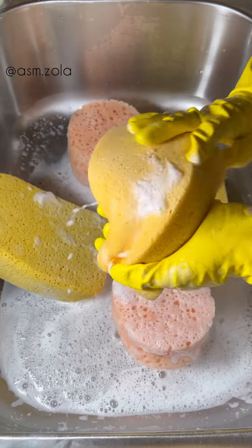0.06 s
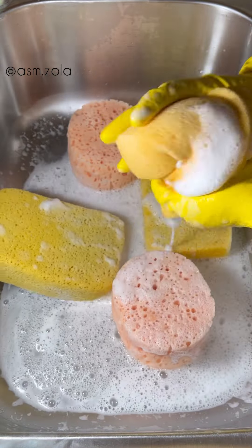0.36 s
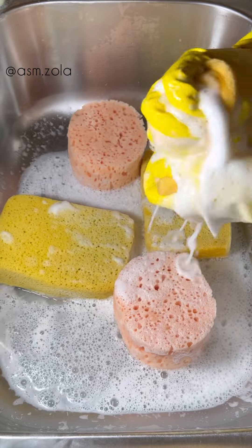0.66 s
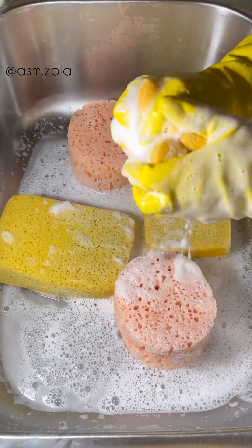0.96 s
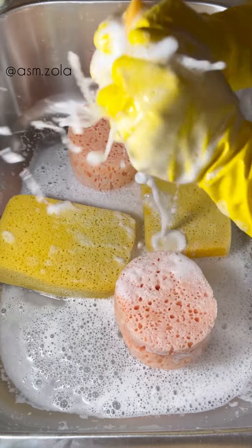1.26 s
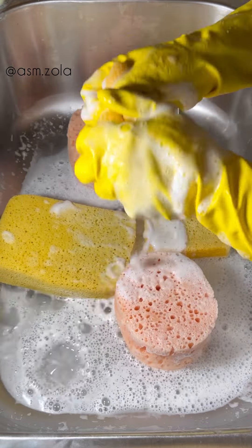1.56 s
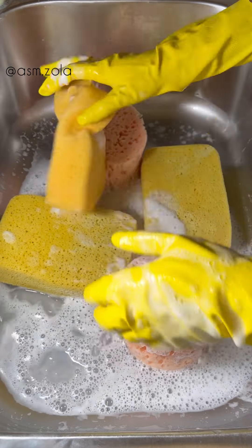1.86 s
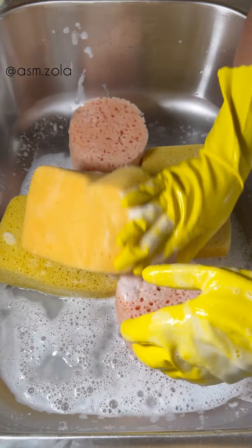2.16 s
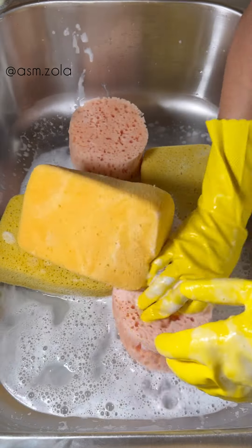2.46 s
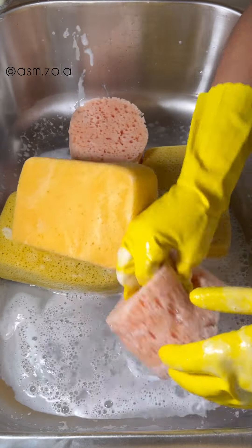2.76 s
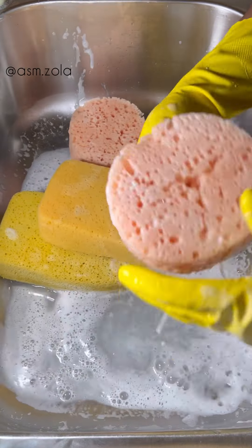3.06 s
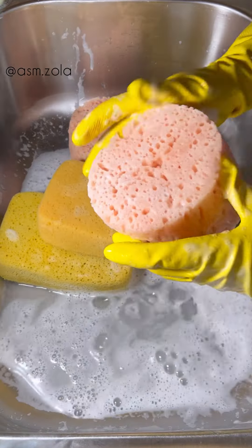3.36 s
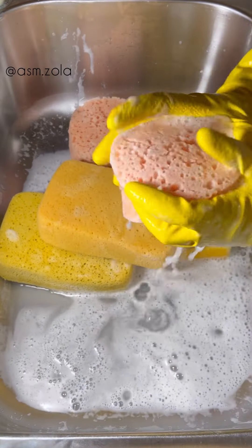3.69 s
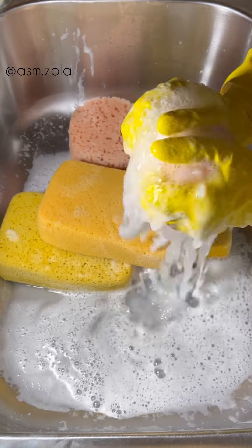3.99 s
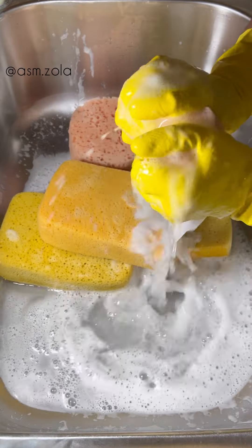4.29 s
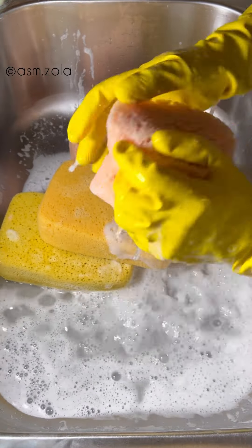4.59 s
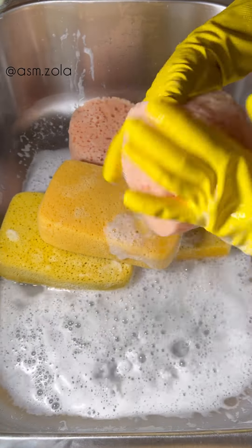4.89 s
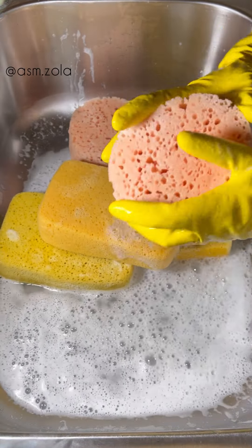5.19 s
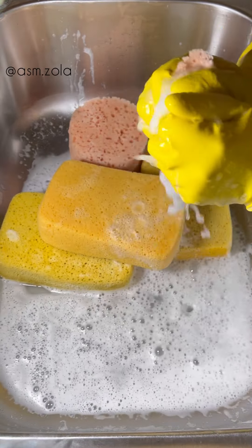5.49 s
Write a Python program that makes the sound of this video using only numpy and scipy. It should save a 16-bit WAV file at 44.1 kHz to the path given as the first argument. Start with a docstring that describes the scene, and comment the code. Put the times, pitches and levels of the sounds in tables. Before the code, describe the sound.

From the start, gloved hands wring a soapy sponge close by, with wet squelches, crackling foam and small bubble pops. Thin hissing squirts escape at about 1.2 seconds, and around 1.5 seconds suds plop into a steel sink with a cluster of soft, low thumps. The fizz eases, with a small squish near 2.3 seconds. At 3 seconds a second sponge is lifted with a dull thud, a plop and a short low gulp, followed by light ticks and wet rubber squishes. From about 3.7 to 4.6 seconds comes the strongest squeeze: sudsy water gushes, spatters and drums on the sink floor, bubbles snap brightly and the steel rings faintly. It dies down, and a gentler, fizzy squeeze runs from 5.2 seconds to the end. The basin adds a tight echo, and a faint low appliance hum continues throughout.

```python
"""Wringing soapy sponges over a steel sink

Gloved hands wring two sponges over a little sudsy water. Air and lather forced through the pores
crackle, bubbles pop and ring as their trapped air oscillates, and water gushes into the foam below.
Falling suds and a lifted sponge thump the sink floor, and the resonances and reflections of the
basin colour the wet sounds. An appliance hums in the room."""
import sys
import numpy as np
from scipy import signal
from scipy.fft import rfft, irfft, next_fast_len
from scipy.io import wavfile
from scipy.ndimage import map_coordinates

SR = 44100
rng = np.random.default_rng(int(sys.argv[2]) if len(sys.argv) > 2 else 0)


def transcribe(signal):
    """Save signal, clipped to [-1, 1], as a 16-bit WAV file at the path in sys.argv[1]."""
    frames = np.atleast_2d(signal).T
    limited = np.clip(frames, -1, 1)
    pcm = np.round(limited * 32767).astype(np.int16)
    wavfile.write(sys.argv[1], SR, pcm)


N = 244314
TIME = np.arange(N) / SR
PADDED = next_fast_len(N + SR // 2, real=True)
FREQS = np.maximum(np.fft.rfftfreq(PADDED, 1 / SR), 1)
FULL_FLOW_DB = -39   # reference flow for the splash and the steel note
FADE_DB = 20   # an attack or a release spans this much
HAND_MOVES_PER_S = 3


# Spectra of bursting foam, from the coarsest cells to the finest: (frequency [Hz], level [dB])
GURGLE_SPECTRUM = [(120, -2), (240, 1.5), (320, -6), (400, -6), (500, 0), (650, 1.5), (770, -1),
                   (900, -1.5), (1030, -10.5), (1300, -11.5), (1900, -14)]
SQUELCH_SPECTRUM = [(900, -21.5), (1350, -2.5), (1750, 2.5), (2400, -1.5), (3500, 0.5), (4400, -5.5),
                    (6000, -31.5)]
FIZZ_SPECTRUM = [(3200, -20.5), (4600, 0.5), (6500, 2), (9300, 1.5), (10500, -7.5), (12500, -8.5)]
SPRAY_SPECTRUM = [(8500, -6.5), (10700, 0.5), (11600, -2), (12400, -29), (15800, -13), (18000, -30)]
MIST_SPECTRUM = [(10500, -12), (12600, 4), (15800, -3), (18000, -21)]

def lather(gurgle_db, squelch_db, fizz_db, spray_db):
    """Shot noise: countless cells burst in the sponge, and the smaller they are the higher they sound."""
    sharp = 0.56 * crackle(per_s=1200, spread_db=2, clump_db=1.5)   # shared by all the upper bands
    coarse = crackle(per_s=1500, spread_db=2.5, clump_db=1.5)
    gurgle = from_db(gurgle_db) * grains(coarse, GURGLE_SPECTRUM, wash_db=-2)
    medium = sharp + crackle(per_s=3500, spread_db=-0.5, clump_db=2.5)
    squelch = from_db(squelch_db - 4) * grains(medium, SQUELCH_SPECTRUM, wash_db=-7)
    fine = sharp + crackle(per_s=9000, spread_db=4.5, clump_db=1.44)
    fizz = from_db(fizz_db - 2) * grains(fine, FIZZ_SPECTRUM, wash_db=-4)
    finest = sharp + crackle(per_s=9800, spread_db=4.5, clump_db=1.5)
    spray = from_db(spray_db - 1) * grains(finest, SPRAY_SPECTRUM, wash_db=-4)
    mist_db = spray_db - 9 + 0.2 * (spray_db + 49)   # the mist grows a little faster than the spray as the flow rises
    mist = from_db(mist_db) * grains(finest, MIST_SPECTRUM, wash_db=3)
    return gurgle + squelch + fizz + spray + mist


# Long wrings; low foaminess is watery, high is airy:
# (time of full grip [s], attack [s], hold [s], release [s], flow [dB], foaminess [dB])
LONG_WRINGS = [(0.015, 0.41, 0.19, 0.65, -51.5, 1.5), (0.445, 0.38, 0.35, 0.8, -50, 3),
               (1.22, 0.024, .14, 0.026, -54, 5), (1.488, 0.16, 0.044, 1, -50, 3),
               (3.2, 0.3, .37, 0.18, -62, 0.5), (3.801, 0.19, 0.47, 0.047, -47.5, -5.5),
               (4.186, 0.46, .17, 0.36, -40, 5.5), (4.87, 0.3, 0.16, 0.16, -62, 1.5),
               (5.268, 0.15, .3, .1, -54, 2.7)]
# Short presses of the fingers: (time [s], half length [s], flow [dB], foaminess [dB])
FINGER_PRESSES = [(0.078, 0.046, -52, 1.5), (0.123, .025, -61, -10), (0.244, 0.045, -49, -6),
                  (0.395, 0.04, -55, -3), (0.456, 0.1, -46.5, -5), (1.206, 0.056, -51.5, -1.5),
                  (1.259, 0.041, -51, 1), (1.54, 0.12, -51.5, -8), (2.28, 0.068, -59.5, -6.5),
                  (2.365, 0.053, -49, 2.5), (2.475, 0.063, -59.5, -2), (3.364, 0.014, -49, 2.3),
                  (3.829, 0.028, -51.5, -11), (4.151, 0.1, -45.5, -10), (4.467, 0.14, -44, 0),
                  (4.548, 0.014, -48, -6), (4.763, 0.047, -57.5, -9), (5.527, 0.088, -52, -3.5)]

def squeezing():
    """Incoherent addition: the flows of all squeezes sum in power, and foaminess is their weighted mean."""
    dulling_db_per_s = 7.5   # the finest foam leaves first while a grip is held
    parts = [(-59.5, 0)]   # the suds go on fizzing between squeezes
    for s, attack_s, hold_s, release_s, db, foam_db in LONG_WRINGS:
        dulling_db = dulling_db_per_s * np.clip(TIME - s, 0, hold_s)
        parts.append((db + grip_db(s, attack_s, hold_s, release_s), foam_db - dulling_db))
    for s, half_s, db, foam_db in FINGER_PRESSES:
        parts.append((db - 12 * np.minimum(((TIME - s) / half_s) ** 2, 10), foam_db))
    power = sum(from_db(db) ** 2 for db, _ in parts)
    weighted_foam = sum(from_db(db) ** 2 * foam_db for db, foam_db in parts)
    return 10 * np.log10(power), weighted_foam / power


def grip_db(s, attack_s, hold_s, release_s):
    """Exponential growth and decay: a grip tightens, holds at 0 dB and lets go."""
    early, late = (s - TIME) / attack_s, (TIME - s - hold_s) / release_s
    return -FADE_DB * np.clip(np.maximum(early, late), 0, 10)


# Gobs of lather leaving the sponge: (time [s], jump in flow [dB])
LATHER_SPURTS = [(0.449, -1), (0.482, 1.5), (0.834, 1.5), (1.218, 4.5), (1.524, 3), (3.673, 4),
                 (3.803, 3.5), (3.83, 2), (3.877, 1.5), (3.903, 5), (3.978, 3.5), (4.043, 3.5),
                 (4.118, 2.5), (4.179, 3), (4.209, 2.5), (4.329, 2.5), (4.378, 3.5), (4.425, 5),
                 (5.214, 2.5), (5.454, 0)]

def spurts_db(rise_s=0.0052):
    """Amplitude modulation: each spurt shifts the flow quickly and lets it settle back."""
    out, age = np.zeros(N), TIME[:SR // 8] / rise_s
    for s, jump_db in LATHER_SPURTS:
        add(out, s - .002, jump_db * age * np.exp(1 - age))
    return out


# Large bubbles bursting between the fingers: (time [s], level [dB], pitch [Hz])
BURSTING_BUBBLES = [(0.126, -38, 1730), (0.483, -37, 1900), (0.519, -40.5, 2500), (0.731, -45.5, 1500),
                    (0.9335, -40, 2270), (0.954, -29, 2370), (0.987, -41, 2340), (1.4645, -39, 2150),
                    (1.5225, -36, 2280), (1.567, -39.5, 2200), (1.591, -41, 2180), (1.6573, -41.5, 2400),
                    (1.675, -45, 2450), (2.0608, -45, 2200), (2.31, -44, 2230), (2.9619, -41, 2630),
                    (3.171, -46, 2170), (3.9375, -28.5, 3420), (4.258, -30.5, 3030), (4.4712, -30, 1900),
                    (4.552, -39.5, 2370), (4.61, -42.5, 3670), (4.6425, -47, 3520), (4.846, -46, 2150),
                    (4.8615, -46.5, 2380)]

def pops():
    """Film rupture excites a cavity resonance: a crack, a short ring, a second tear and a wet tail."""
    out = np.zeros(N)
    for s, db, hz in BURSTING_BUBBLES:
        ring_db = 1 + 8 * np.log2(hz / 2380)   # smaller bubbles ring more cleanly
        add(out, s + 0.0004, from_db(db + 0.5 - ring_db) * splat(hz, octaves=0.74, decay_s=0.0014))
        add(out, s + 0.0006, from_db(db - 3 + ring_db) * bubble(hz, cycles=4.3, rise=0.023))
        add(out, s + 0.00261, from_db(db + 2) * splat(hz, octaves=0.32, decay_s=0.0031))
        add(out, s + 0.003, from_db(db - 8) * splat(hz, octaves=0.4, decay_s=0.012))
    return out


# Lumps of water landing: (time [s], level [dB], pitch [Hz], ring length [cycles])
WATER_LUMPS = [(0.128, -49, 850, 3), (0.243, -41.5, 500, 3.1), (0.444, -42, 500, 2.8),
               (0.453, -40, 640, 3.5), (0.9875, -35, 696, 2.4), (1.467, -39.5, 740, 4.6),
               (1.523, -36.5, 437, 2.5), (1.526, -34, 720, 3.6), (1.5685, -30, 735, 3.4),
               (1.571, -34, 294, 1.8), (1.578, -42, 1210, 4), (2.487, -43.5, 660, 1.9),
               (2.9635, -28.5, 490, 2.5), (2.966, -26.5, 720, 4.5), (2.977, -39.5, 880, 7.2),
               (4.058, -31, 766, 3.3), (4.119, -33, 800, 4), (4.423, -27, 750, 2.1),
               (4.489, -30.5, 1130, 3.7)]

def plops():
    """Air entrainment on impact: a lump of water traps a ringing pocket, splashes and knocks the bowl."""
    knocks, splash_envelope, ring = np.zeros(N), np.zeros(N), basin_ring(soft_hz=824)
    for s, db, hz, cycles in WATER_LUMPS:
        add(knocks, s, from_db(db - 2.5) * bubble(hz, cycles, rise=0.017))
        add(knocks, s + 0.0022, from_db(db - 24.5) * ring)
        add(splash_envelope, s, from_db(db - 16) * np.exp(-TIME[:SR // 5] / 0.014))
    drops = crackle(per_s=5400, spread_db=-1, clump_db=2.5)
    return knocks + splash_envelope * grains(drops, GURGLE_SPECTRUM, wash_db=-20)


# Soap films and droplets snapping: (time [s], level [dB], centre frequency [Hz])
FILM_SNAPS = [(1.1743, -37, 5570), (1.427, -44, 7500), (1.485, -38, 8340), (1.587, -43, 8500),
              (2.957, -40, 8040), (2.9664, -40.5, 5860), (3.072, -40.5, 7950), (3.1033, -47, 7500),
              (3.124, -46.5, 6500), (3.1445, -50, 6500), (3.195, -43, 6850), (3.2324, -43.5, 5900),
              (3.241, -44, 8000), (4.2547, -27.5, 8800), (4.2862, -29, 6630), (4.336, -28, 6820),
              (4.423, -30, 5840), (4.456, -25, 7860), (4.542, -29.5, 8800), (4.553, -30.5, 9000),
              (4.8566, -44, 6900)]
# Treble response of the foam around a snap: (frequency [Hz], gain [dB])
FOAM_RESPONSE = [(8000, 4), (11000, 6.5), (12500, -1), (16000, 6)]

def snaps():
    """Brief events have broad spectra: a film breaks with a bright tick, coloured by foam and basin."""
    out = np.zeros(N)
    for s, db, hz in FILM_SNAPS:
        add(out, s + 0.00091, from_db(db - 2.5) * splat(hz, octaves=0.62, decay_s=0.0039))
    return colour(out, over_hz(FOAM_RESPONSE) + basin_db())


# Spectrum of the air whipped into the water: (frequency [Hz], level [dB])
SPLASH_SPECTRUM = [(2400, -7.5), (2750, -2.5), (3150, -4), (3700, -0.5), (4400, -9)]

def splash(flow_db):
    """A plunging jet entrains fine, bright bubbles, growing louder until the flow is full."""
    level_db = -46 + 1.38 * np.minimum(flow_db - FULL_FLOW_DB, 0)
    bursts = crackle(per_s=900, spread_db=1.5, clump_db=2.5)
    return from_db(level_db) * grains(bursts, SPLASH_SPECTRUM, wash_db=-7)


def small_bubbles(level_db, low_hz, high_hz, count):
    """Bubble resonance: single air pockets ring out of the lather, their loudness following the flow."""
    out = np.zeros(N)
    for when, pitch, size in rng.random((count, 3)):
        gain = from_db(level_db[int(when * N)] - 10 * np.sqrt(size))
        hz = low_hz * (high_hz / low_hz) ** pitch
        add(out, when * N / SR, gain * bubble(hz, cycles=4.9, rise=0.17))
    return out


def spatter(flow_db, low_hz, high_hz, per_s):
    """Sparse transients stay distinct: droplets and single cells tick above the fizz."""
    out = np.zeros(N)
    for when, pitch, size in rng.random((int(per_s * N / SR), 3)):
        gain = from_db(flow_db[int(when * N)] - 6.5 + 16 * size ** 2)
        hz = low_hz * (high_hz / low_hz) ** pitch
        add(out, when * N / SR, gain * splat(hz, octaves=0.62, decay_s=0.0022))
    return out


# Thin jets spitting from the fist: (time [s], length [s], level [dB], centre frequency [Hz])
FOAM_JETS = [(1.22, .014, -49, 9050), (1.227, .012, -51, 11600), (1.237, .025, -53, 12600),
             (1.262, 0.032, -50, 11400), (1.3085, 0.008, -48, 11000), (1.3296, 0.006, -42.5, 10000),
             (1.337, 0.009, -43, 10900), (1.349, .013, -45, 10600), (3.232, 0.013, -49, 6230)]

def squirts():
    """Jet noise: foam forced through a gap between the fingers hisses in one narrow, high band."""
    out = np.zeros(N)
    for s, length_s, db, hz in FOAM_JETS:
        gate = signal.windows.tukey(int(length_s * SR))
        hiss = rms_one(splat(hz, octaves=0.21, decay_s=.05)[:len(gate)])
        add(out, s, from_db(db) * gate * hiss)
    return out


# A released sponge drawing air back through its pores: (time [s], half length [s], level [dB])
SPONGE_INHALES = [(0.256, .025, -54.5), (0.437, .06, -53), (1.663, 0.022, -55), (2.325, .06, -62),
                  (3.258, 0.12, -62.5), (3.452, 0.065, -65), (3.537, 0.023, -53), (3.665, 0.016, -61),
                  (4.704, 0.034, -61), (4.99, .04, -61), (5.47, 0.085, -56.5)]
# Spectrum of the air sucked through the wet pores: (frequency [Hz], level [dB])
SQUISH_SPECTRUM = [(1500, -9), (1900, -3), (2350, 0), (2700, -4), (3200, -12.5)]

def squishes():
    """Suction through wet pores: a released sponge draws air back in a run of small, throaty cracks."""
    envelope = sum(from_db(db - 6 * np.minimum(((TIME - s) / half_s) ** 2, 20))
                   for s, half_s, db in SPONGE_INHALES)
    cracks = crackle(per_s=1100, spread_db=1.5, clump_db=2)
    return envelope * grains(cracks, SQUISH_SPECTRUM, wash_db=-8.5)


# Soft blows on the sink floor: (time [s], level [dB], panel frequency [Hz])
FLOOR_BLOWS = [(0.125, -37.5, 102), (0.992, -45.5, 154), (1.478, -31, 112.6), (1.516, -32, 104),
               (1.534, -27.5, 108), (1.551, -32, 110), (1.578, -27, 113), (1.626, -34.5, 117),
               (2.98, -20, 106), (4.976, -42.5, 152), (5.502, -49, 124)]

def sink_floor(swell_s=0.0088):
    """Damped plate vibration: the panel under the water gives a few swings and rings the bowl."""
    out, ring, t = np.zeros(N), basin_ring(soft_hz=560), TIME[:SR // 6]
    swell = (t / swell_s * np.exp(1 - t / swell_s)) ** 2.53
    for s, db, hz in FLOOR_BLOWS:
        add(out, s, -from_db(db) * swell * np.sin(2 * np.pi * hz * t))
        add(out, s + .003, from_db(db - 17) * splat(237, octaves=0.53, decay_s=0.018))
        add(out, s + 0.00295, from_db(db - 28.5) * ring)
    return out


def gulp(start_s=2.997, hold_s=0.078, release_s=0.069, start_hz=104, end_hz=64.2, glide_s=0.016):
    """Cavity resonance: the hollow under the lifted sponge widens, so its note falls until it lets go."""
    out, t = np.zeros(N), TIME[:SR // 3]
    hz = end_hz + (start_hz - end_hz) * np.exp(-t / glide_s)
    level_db = -33.5 - 45 * t - FADE_DB * np.maximum(t - hold_s, 0) / release_s
    onset = 1 - np.exp(-t / 0.005)
    add(out, start_s, -from_db(level_db) * onset * np.sin(2 * np.pi * np.cumsum(hz) / SR))
    return out


# Spectra of the drumming sink floor and of its ringing steel note: (frequency [Hz], level [dB])
DRUMMING_SPECTRUM = [(35, -7), (65, -2.5), (115, 0.5), (170, -6), (250, -9), (320, -16), (600, -46)]
STEEL_SPECTRUM = [(1700, -44.5), (2330, -24), (2430, 0), (2470, 4), (2510, -3), (2610, -18), (3400, -48)]

def pour(flow_db, start_s=3.79, sag_db_per_s=7.5):
    """Forced vibration: a thinning stream drums on the sink floor, and heavy flow rings one steel note."""
    stream_db = -43 + grip_db(start_s, attack_s=0.13, hold_s=0.82, release_s=0.27)
    stream_db -= sag_db_per_s * np.maximum(TIME - start_s, 0)
    drops = crackle(per_s=440, spread_db=2, clump_db=2.5)
    drumming = from_db(stream_db) * grains(drops, DRUMMING_SPECTRUM, wash_db=-50)
    note_db = FULL_FLOW_DB - 11.5 + 1.41 * (flow_db - FULL_FLOW_DB)
    falling_suds = crackle(per_s=670, spread_db=6, clump_db=3)
    return drumming + from_db(note_db) * grains(falling_suds, STEEL_SPECTRUM, wash_db=-12)


# Modes of the steel basin: (frequency [Hz], bandwidth [Hz], lift [dB])
BASIN_MODES = [(257.6, 37, 5.5), (371, 28, 2), (469, 53, 4), (730, 140, 3.5), (926.5, 15.4, 9.5),
               (1148, 83, 6.5), (1242, 40, 5.5), (2200, 200, 4), (2417, 234, 8), (3720, 110, -1),
               (6810, 270, 5.5), (7940, 320, 4.5)]

def basin_db():
    """Resonant response: the bowl lifts the sound near each of its modes."""
    return sum(lift_db / (1 + (2 * (FREQS - hz) / width) ** 2) for hz, width, lift_db in BASIN_MODES)


def basin_ring(soft_hz):
    """Free vibration: a soft blow excites mainly the modes below soft_hz; broad modes die fastest."""
    ring, t = 0, TIME[:SR // 4]
    for hz, width, lift_db in BASIN_MODES:
        gain = from_db(lift_db) / (1 + (hz / soft_hz) ** 4)
        ring += gain * np.sin(2 * np.pi * hz * t) * np.exp(-.6 * np.pi * width * t)
    return ring


# First bounces off the near steel wall: (delay [s], gain [dB])
WALL_BOUNCES = [(.000452, -23.5), (.000864, -18.5), (.00134, -26.5)]

def near_wall(pair):
    """Comb filtering: bounces interfere with the direct sound, and the ripple slides as the hands move."""
    stretch, now = np.exp(0.216 * drift(HAND_MOVES_PER_S)), np.arange(N)
    out = pair.copy()
    for delay_s, db in WALL_BOUNCES:
        emitted = now - delay_s * SR * stretch
        out += from_db(db) * np.array([np.interp(emitted, now, side) for side in pair])
    return out


def reflections(pair, walls_db, walls_t60, room_db, room_t60):
    """Early and late reflections: quick sink echoes that shift with the hands, then a kitchen tail."""
    places = np.array([drift(HAND_MOVES_PER_S) for _ in range(4)])
    places /= np.sqrt(np.sum(places ** 2, axis=0))   # constant-power blend of four hand positions
    walls = sum(echoes(pair * share, walls_t60) for share in places)
    return near_wall(pair) + from_db(walls_db) * walls + from_db(room_db) * echoes(pair, room_t60)


def echoes(pair, t60):
    """Diffuse reverberation: dense echoes, different at each microphone, fall 60 dB in t60 seconds."""
    t = TIME[:SR // 2]
    echo = rng.standard_normal((2, len(t))) * from_db(-60 * t / t60) * (t > .001)
    echo /= np.sqrt(np.sum(echo ** 2, axis=1, keepdims=True))
    return signal.fftconvolve(pair, echo, axes=1)[:, :N]


# Lead of the left microphone over the right: (frequency [Hz], phase [rad])
LEFT_LEAD = [(500, -0.0025), (2500, 0.17), (2840, -0.2), (3400, -0.19), (4400, 0.1), (5250, 0.51),
             (7000, -1.27), (15500, -1.56)]
# Level of the left microphone over the right: (frequency [Hz], level [dB])
LEFT_EXCESS = [(2900, 0.15), (3600, -1), (4400, 2.5), (5000, 1), (5700, 1), (9000, 0)]
# Stereo width of the diffuse sound: (frequency [Hz], side gain [dB])
DIFFUSE_WIDTH = [(100, -7), (500, -6), (1200, -2.5), (2350, -5.5), (2900, 8.5), (3700, 2), (4800, 6.5),
                 (5700, 3), (16000, -13.5)]

def microphones(pair):
    """Path difference: long waves reach two close microphones alike, short ones out of step."""
    left, right = rfft(pair, PADDED)
    mid = (left + right) / 2
    side = (left - right) / 2 * from_db(over_hz(DIFFUSE_WIDTH))
    turn = np.exp(.5j * over_hz(LEFT_LEAD)) * from_db(over_hz(LEFT_EXCESS) / 2)
    return irfft([(mid + side) * turn, (mid - side) / turn], PADDED)[:, :N]


# Harmonics of the appliance: (frequency [Hz], rms level [dB])
HUM_HARMONICS = [(59.2, -49.5), (118.4, -64)]
# Spectrum of the room's rumble: (frequency [Hz], level [dB])
RUMBLE_SPECTRUM = [(20, -38), (38, -22), (52, -1.5), (75, -10), (115, -7.5), (160, -16.5), (300, -27.5),
                   (900, -42)]

def room_tone(waver_db=0.7):
    """A line spectrum over a continuous one: a slightly wavering appliance hum above low rumble."""
    waver = from_db(-waver_db * drift(5))
    hum = sum(np.sqrt(2) * from_db(db) * np.sin(2 * np.pi * hz * TIME) for hz, db in HUM_HARMONICS)
    rumble = rms_one(colour(rng.standard_normal(N), band_db(RUMBLE_SPECTRUM)))
    return waver * hum + from_db(-55) * rumble


def crackle(per_s, spread_db, clump_db):
    """A random point process: impulses of uneven size, swelling and fading in clumps; rms 1."""
    born = rng.random(N) < per_s / SR
    sizes = from_db(spread_db * np.minimum(rng.exponential(1, N), 4))
    return rms_one(born * sizes * rng.choice([-1, 1], N) * from_db(clump_db * drift(130)))


def grains(clicks, spectrum, wash_db):
    """Source and filter: clicks and a diffuse stereo wash, shaped by a spectrum and the basin; rms 1."""
    pair = clicks + from_db(wash_db) * rng.standard_normal((2, N))
    return rms_one(colour(pair, band_db(spectrum) + basin_db()))


def bubble(hz, cycles, rise):
    """A damped oscillator: an air pocket swells, rings and dies, its pitch climbing as it opens."""
    age = np.arange(int(4 * cycles / hz * SR)) / SR * hz / cycles
    swell = 2 * age * np.exp(1 - 2 * age)
    return swell * np.sin(2 * np.pi * cycles * (age + rise * (age ** 2 / 2 - .6 * age)))


def splat(hz, octaves, decay_s):
    """A noise transient: fine spatter in a band around one pitch, decaying exponentially."""
    t = TIME[:SR // 8]
    edges = np.clip([hz / 2 ** octaves, hz * 2 ** octaves], 20, .45 * SR)
    band = signal.butter(2, edges, "band", fs=SR, output="sos")
    noise = signal.sosfilt(band, rng.standard_normal(2 * len(t)))[len(t):]
    return .5 * rms_one(noise) * np.exp(-t / decay_s)


def colour(x, gain_db):
    """Minimum-phase filtering: folding the cepstrum makes the given response causal."""
    cepstrum = irfft(np.log(from_db(gain_db)), PADDED)
    cepstrum[1:PADDED // 2] *= 2
    cepstrum[PADDED // 2 + 1:] = 0
    return irfft(rfft(x, PADDED) * np.exp(rfft(cepstrum)), PADDED)[..., :N]


def band_db(points):
    """Band limiting: a spectrum falls 24 dB per octave beyond its ends."""
    octaves_outside = np.log2(FREQS / np.clip(FREQS, points[0][0], points[-1][0]))
    return over_hz(points) - 24 * np.abs(octaves_outside)


def over_hz(points):
    """Interpolation of a table along logarithmic frequency."""
    hz, value = np.transpose(points)
    return np.interp(np.log(FREQS), np.log(hz), value)


def drift(per_s):
    """Smooth random modulation; rms 1."""
    knots = rng.standard_normal(N // 50)
    return rms_one(map_coordinates(knots, [TIME * per_s], order=2, mode="mirror"))


def add(track, s, sound):
    """Superposition of a short sound at time s."""
    at = int(np.clip(s * SR, 0, N - 1))
    track[at:at + len(sound)] += sound[:N - at]


def from_db(db):
    """Decibels to amplitude ratio."""
    return 10 ** (np.asarray(db) / 20)


def rms_one(x):
    """Normalisation to unit power."""
    return x / np.sqrt(np.mean(x ** 2) + 1e-20)


def scene():
    """Superposition: the wet sounds echo in the sink; thumps, gulp, pour and hum are added directly."""
    flow_db, foam_db = squeezing()
    flow_db = flow_db - 0.7 + spurts_db() + 0.82 * drift(35)   # suds leave the sponge unevenly
    foam_db = foam_db + 0.58 * drift(24)   # wetter suds gurgle and squelch, airier ones spray
    second_sponge = TIME > 3.1   # it has wider pores
    gurgle_db = flow_db - 5.5 - 1.14 * foam_db - 0.8 * second_sponge
    squelch_db = flow_db - 1.87 - 0.88 * foam_db + 1.5 * second_sponge
    spray_db = flow_db - 9 + 1.6 * foam_db
    wet = lather(gurgle_db, squelch_db, flow_db, spray_db) + splash(flow_db)
    wet += pops() + plops() + snaps() + squirts() + squishes()
    wet += spatter(flow_db, low_hz=2500, high_hz=11000, per_s=90)
    wet += small_bubbles(squelch_db + 3, low_hz=1840, high_hz=4390, count=260)
    wet += small_bubbles(gurgle_db + 0.5, low_hz=500, high_hz=1242, count=70)
    pair = reflections(wet, walls_db=-7, walls_t60=0.037, room_db=-10.5, room_t60=0.42)
    return microphones(pair) + sink_floor() + gulp() + pour(flow_db) + room_tone()


def record(dry):
    """Low-pass filtering: the treble is cut steeply above 15750 Hz."""
    return signal.sosfilt(signal.ellip(12, .1, 80, 15750, fs=SR, output="sos"), dry)


dry = scene()
out = record(dry)
transcribe(out)
```